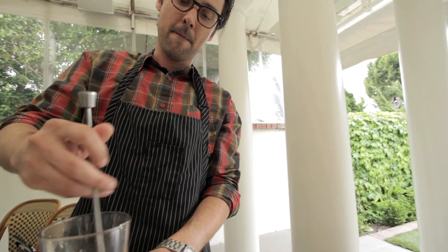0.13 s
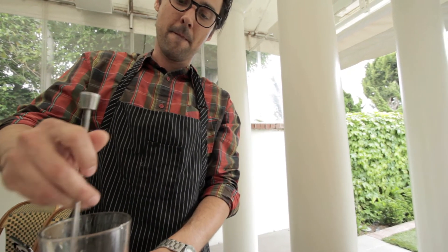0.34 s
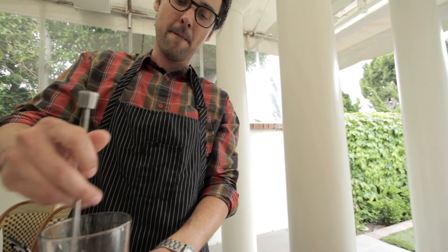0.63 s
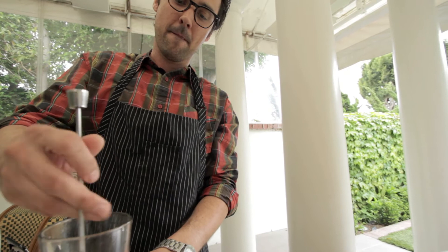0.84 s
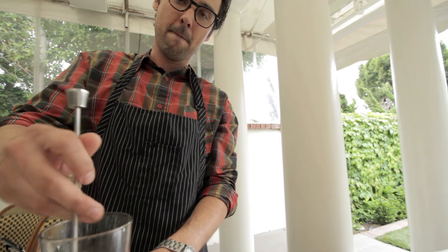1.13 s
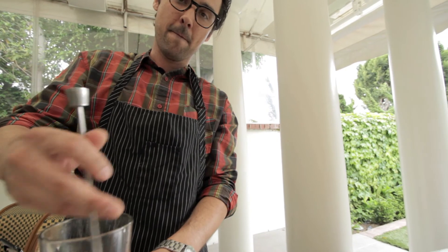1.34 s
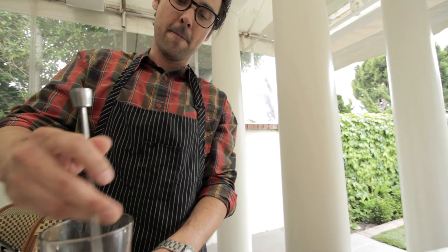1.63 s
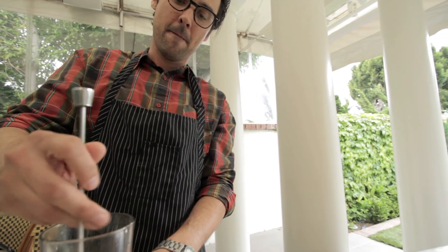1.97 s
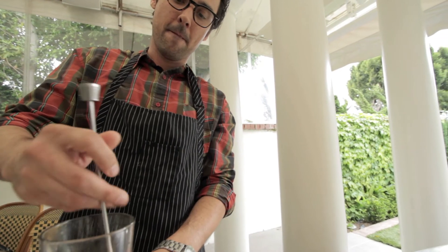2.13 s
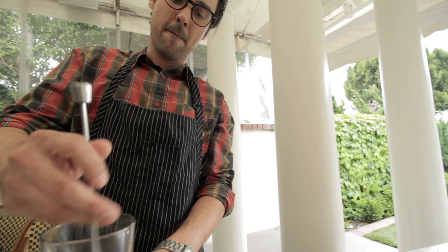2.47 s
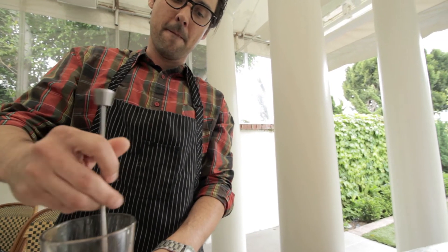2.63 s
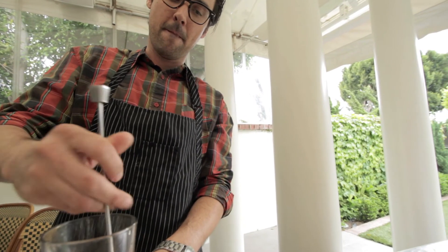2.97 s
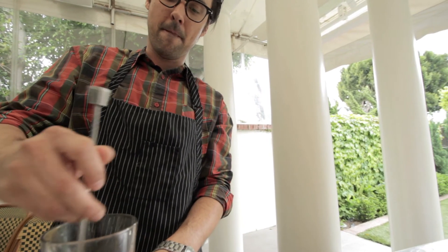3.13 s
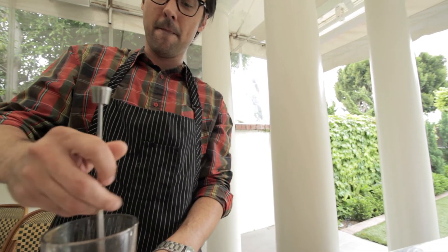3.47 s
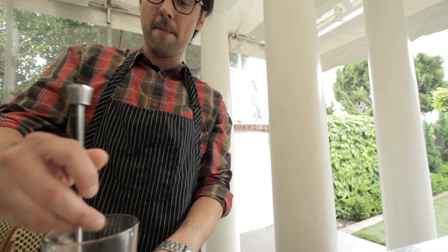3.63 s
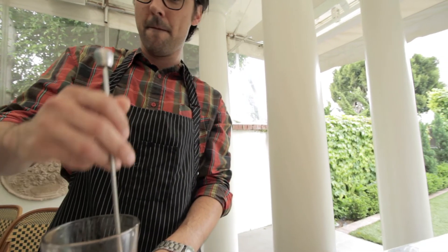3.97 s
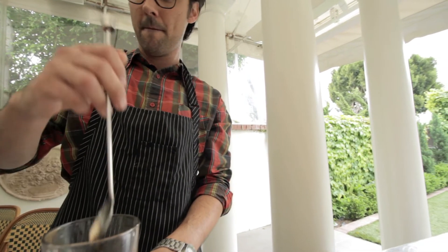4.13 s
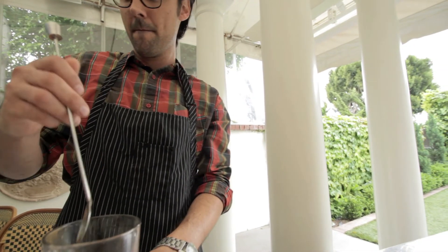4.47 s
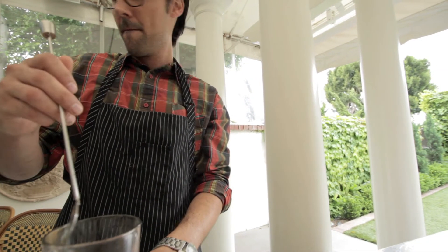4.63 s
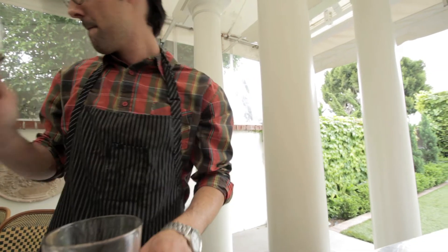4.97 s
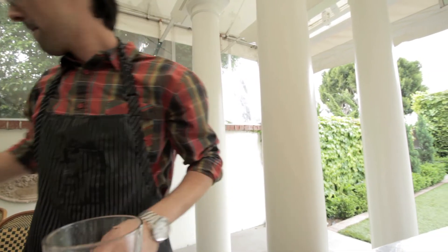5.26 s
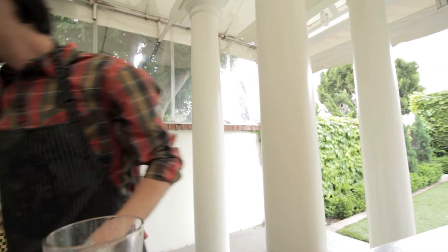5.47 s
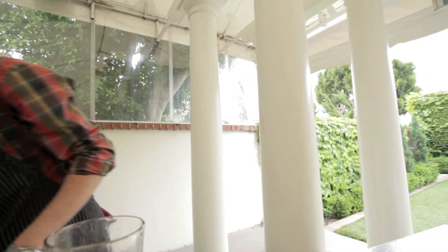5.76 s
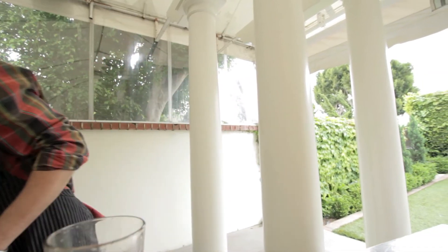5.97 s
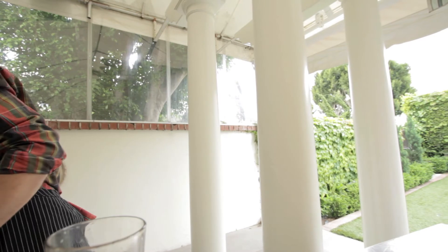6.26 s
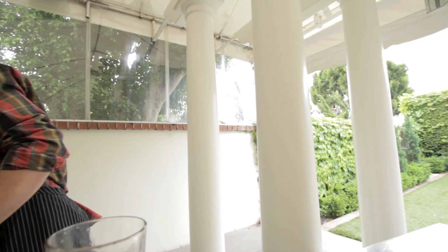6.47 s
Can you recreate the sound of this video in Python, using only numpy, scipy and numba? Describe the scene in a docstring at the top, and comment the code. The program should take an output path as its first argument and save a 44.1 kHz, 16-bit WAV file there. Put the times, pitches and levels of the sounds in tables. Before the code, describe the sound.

Rapid crisp ice ticks and short glassy rings fill the first four seconds, circling slightly between left and right, while the glass bumps dully on its table. The spoon drags out and taps the rim twice with ringing clinks. A quieter gap of low rumble follows, then things are set down and shuffled on hollow wood, more distant and more reverberant, knocking, scraping and briefly squeaking. Close stereo pickup on a covered porch.

```python
"""On a porch table, close to a small stereo microphone, a long spoon stirs ice in a tall glass.
Ice contacts are noise ticks that excite decaying modes of cubes and glass; the glass thuds on the table.
The spoon taps the rim twice, then things are set down and shuffled on a wooden shelf further off, heard as
knocks, modal ringing, grit noise and two squeaks. Shaped noise makes a low background rumble, with a part
near 100 Hz, whose heard level dips and recovers; scattered noise tails stand for the porch."""
import sys
import numpy as np
from scipy import signal
from scipy.fft import rfft, irfft, next_fast_len
from scipy.io import wavfile
from scipy.ndimage import uniform_filter1d, map_coordinates
from numba import njit

SR = 44100
rng = np.random.default_rng(int(sys.argv[2]) if len(sys.argv) > 2 else 0)


def inscribe(sig):
    """Save sig as 16-bit PCM at rate SR to the path in sys.argv[1].

    A 1-D sig is mono; a 2-D sig holds one channel per row.
    Samples are clipped to [-1, 1] before scaling.
    """
    pcm = np.round(np.clip(np.atleast_2d(sig).T, -1, 1) * 32767)
    wavfile.write(sys.argv[1], SR, pcm.astype(np.int16))


N = 291049

# All table levels are relative; each source adds its own offset.
# Cube and spoon contacts: (time [s], tick peak [dB], then against the tick: wall tone [dB],
# side tone [dB], treble [dB], cube ring [dB]; cube pitch [Hz])
ICE_CONTACTS = [(0.0054, -25, -3, -6, -10, -4, 2340), (0.0454, -8.5, -24, -9, -11, -8, 3090),
                (0.0628, -18, -6, -21, -14, 2, 3060), (0.1084, -24, -4, -28, -17, 0, 2600),
                (0.179, -7, -13, -29, -12, -13.5, 3054), (0.2124, -20, -26, -7, -9, -15, 3100),
                (0.2403, -7, -33, -22, -26, -17, 3170), (0.26, -10, -19, -27, -10, -24, 2260),
                (0.3144, -10, -7, -10, -15, -8, 2710), (0.3341, -2.5, -34, -18, -25, -14, 4000),
                (0.376, -27, -20, -22, -20, 4, 3100), (0.4489, -2, -20, -14, -13.5, -13, 3050),
                (0.543, -14, -17, -10, -10, -23, 2750), (0.5674, -20, -15, -20, -7, -23, 2240),
                (0.596, -8, -22.5, -14, -16, -16, 3750), (0.6274, -14.5, -9, -28, -29, -5, 3000),
                (0.7218, -24.5, -18, -23, -10, -13, 3070), (0.7786, -5.5, -49, -36, -11.5, -20, 3990),
                (0.7981, -14, -27, -27, -4, -16, 2920), (0.8483, -22, -8.5, -11, -28, -17, 2630),
                (0.8664, -4.5, -20, -28, -18, -21, 3830), (0.8777, -12, -40, -6, -11, -16, 4030),
                (0.9547, -16, -35, -26, -21, -12, 2600), (1.0056, -10.5, -21, -11, -18, -16, 3190),
                (1.0234, -8, -10, -28, -13, -21, 3060), (1.0755, -4, -18.5, -10.5, -15.5, -33, 2680),
                (1.1358, -9.5, -14, -15, -38, -21, 4060), (1.1532, -12, -17, -11.5, -32, -16, 2840),
                (1.1811, -5.5, -20, -16, -22, -5, 2790), (1.1926, -19.5, -4, -31, -25, 0.5, 3080),
                (1.276, -16, -32, -31, -8.5, -15, 3070), (1.2996, -10.5, -33, -36, -18, -16, 2900),
                (1.3478, -3, -15.5, -28, -12.5, -29, 2900), (1.434, -17.5, -37, -9, -17, -21, 3120),
                (1.4557, -15, -8, -10, -32, -6, 3060), (1.479, -7.5, -34, -16, -15, -19, 4240),
                (1.4855, -22.5, -17, -11, -26, 2.5, 3020), (1.5723, -22.5, -23, -7, -4, -13, 3040),
                (1.5846, -23.5, -15, -33, -21, 4.5, 2380), (1.6341, -8.5, -14.5, -11, -4.5, -31, 3000),
                (1.6887, -16.5, -3.5, -11, -16, -48, 3100), (1.7413, -11, -10, -17, -9.5, -21, 2870),
                (1.764, -7, -20, -11, -20, -6.5, 3150), (1.8048, -24, -8, -30, -15, 2.5, 2750),
                (1.8592, -7.5, -23, -17, -11, -4, 2730), (1.8954, -11.5, -12, -9, -13, -24, 2700),
                (1.9344, -11, -19, -37, -7, -30, 2860), (1.9794, -19.5, -5.5, -12, -13, -29, 2460),
                (2.0009, -10.5, -55, -13.5, -8, -34, 3900), (2.1266, -33, -14, -28, 3, -9, 2720),
                (2.1615, -15.5, -13.5, -25, -5, -7.5, 3030), (2.1774, -13, -10, -12, -9, -27, 2960),
                (2.2146, -19.5, -5, -28, -3, -20, 2290), (2.2608, -17, -5, -15, -12, -26, 2520),
                (2.2804, -16, -9, -6.5, -17, -28, 3070), (2.2971, -10.5, -26, -14, -13.5, -20, 3000),
                (2.3446, -21.5, -5, -23, -15, -6, 3080), (2.4124, -10.5, -9.5, -5.5, -24, -14, 4050),
                (2.4751, -7.5, -10, -19, -8, -29, 2520), (2.5192, -15, -6, -13, -10, -20, 2660),
                (2.5366, -9, -9, -11, -16, -21, 2720), (2.5646, -7.5, -15.5, -16.5, -26, -20, 3110),
                (2.6096, -27, -39, -25, -23, -6, 2980), (2.6285, -5, -26, -25, -23, -6.5, 2945),
                (2.717, -12, -10, -27, -6.5, -17, 2670), (2.7484, -9.5, -18, -23, -17, -32, 3970),
                (2.813, -12.5, -9.5, -27, -23, -19, 3200), (2.8432, -7, -20, -15, -18, -22, 2950),
                (2.8738, -20.5, -32, -27, -29, 0, 2960), (2.9712, -13, -3.5, -7, -13.5, -15, 3400),
                (3.0084, -15.5, -11, -13, -27, -19, 3120), (3.0761, -21, -6, -17, -10, -26, 3020),
                (3.1067, -16, -33, -6, -12, -12, 4030), (3.1174, -18.5, -23, -15, -23, -1, 3850),
                (3.1356, -16, 1, -16, -31, -7, 3760), (3.1802, -12.5, -55, -13, -12.5, -14, 2870),
                (3.242, -12.5, -12, -17, -30, -22, 3060), (3.2625, -4, -17.5, -29, -8.5, -31, 2200),
                (3.3352, -17.5, -14, -19, -20, -23, 2220), (3.3903, -8, -15, -23, -18, -29, 3000),
                (3.5084, -15.5, -7.5, -23, -18, -21, 2950), (3.558, -16, -22, -12, -18, -13, 3080),
                (3.5885, -0.5, -15.5, -10.5, -7.5, -31, 3940), (3.5957, -10, -24, -12, -18, -8, 4100),
                (3.654, -10.5, -29, -11, -6, -24, 3100), (3.6751, -7.5, -11, -13, -11.5, -20, 3000),
                (3.7359, -14.5, -24, -12, -22, -18, 3060), (3.768, -21.5, -2, -27, -36, 4.5, 2630),
                (3.8004, -18, -21, -13, -24, -22, 3220), (3.8701, -8.5, -14, -25, -11.5, -18, 2680),
                (3.8896, -18.5, -40, -7, -5, -2.5, 2510), (3.9109, -30, 1.5, -18, -26, 10, 2480),
                (3.9589, -24.5, 3, -6, -28, -1, 2500), (3.9894, -40.5, 18, -23, -35, 7, 3100),
                (4.0414, -30, -19, -20, -14, -8, 3140)]
# Spoon on the rim: (time [s], tick peak [dB], then against the tick: wall tone [dB], side tone [dB],
# treble [dB], short ring [dB]; short ring pitch [Hz])
RIM_TAPS = [(4.3784, 0.56, -11, -28.5, -24, -24.1, 2800), (4.555, 0.54, -13.5, -26.5, -25.5, -13, 2310)]
# Glass modes before loading: (frequency [Hz], level [dB], t60 [s], name of the level that drives it)
GLASS_MODES = [(1928, -11, 0.7, "wall"), (1939, 2, 0.27, "wall"), (4338, -12, .6, "second"),
               (4344, -2, 0.36, "second"), (4870, 2, 0.085, "treble"), (4835, -1.5, 0.4, "side"),
               (7400, -4, 0.45, "treble"), (7488, -2, 0.13, "treble"), (8667, -10, .1, "treble"),
               (11220, -4, 0.25, "side"), (14030, -14, .08, "treble")]
# Drive of the second glass tone against the tick: (time [s], level [dB])
SECOND_TONE_LEVEL = [(0, -36), (2.0, -87), (2.7, -31), (3.5, -11.5), (3.6, -15.5), (3.75, -4), (4.0, -29),
                     (4.35, -17)]
# Ice cube modes: (frequency [Hz], level [dB], t60 [s], name of the level that drives it)
CUBE_MODES = [(3046, -4.5, 0.027, "cube"), (4755, 9.5, 0.022, "side"), (5455, 7, 0.0089, "side"),
              (7300, 10, 0.013, "treble"), (10380, 11.5, 0.0098, "treble"), (10600, -63, 0.0074, "cube")]
# Glass rocking on the table: (time [s], peak [dB], grinding noise against it [dB])
TABLE_THUDS = [(0.009, -20.5, -16), (0.275, -17.5, -13.5), (0.551, -22.5, -15.5), (0.789, -22.5, -5.5),
               (1.088, -23, -11), (1.348, -18, -7), (1.634, -16, -10), (1.94, -22.5, -11.5),
               (2.207, -22, -12.5), (2.476, -17, -10.5), (2.817, -30, -13), (3.56, -27.5, -6.5)]
# Table top modes: (frequency [Hz], level [dB], t60 [s])
TABLE_MODES = [(165, -2, 0.18), (184.7, 2, 0.048), (258, -3.5, 0.076)]
# Things set down on a shelf: (time [s], peak [dB], hollow tone against it [dB], treble against it [dB])
SHELF_KNOCKS = [(5.774, 0, -18.5, -12), (5.787, -10, -5, -12), (6.024, -5, -14, -12),
                (6.038, -12, -17, -14), (6.083, -7, -11.5, -15), (6.128, -12.5, -28, -29),
                (6.205, -3.5, 0, -36), (6.217, -37, -6, -20), (6.234, -24, 4, -10)]
# Shelf modes: (frequency [Hz], level [dB], t60 [s])
SHELF_MODES = [(461.6, -4, 0.091), (586, -1, 0.11), (649, -4, 0.083), (1084, -29, 0.11),
               (1217, -2.5, 0.018), (1330, -2.5, 0.0088), (2344, -11, 0.026)]
# Drags across the shelf: (time [s], length [s], level [dB], treble against it [dB])
SHELF_SCRAPES = [(5.51, 0.08, -40.5, 2), (5.798, 0.19, -36, -5), (5.88, 0.072, -35.5, 1.5),
                 (6.054, 0.045, -50, -7), (6.079, 0.072, -29.5, -7.5), (6.222, 0.13, -29, -19.5),
                 (6.564, 0.047, -46, 15)]
# Narrow squeaks: (time [s], frequency [Hz], level [dB], length [s])
SHELF_SQUEAKS = [(5.909, 1593, -26, 0.045), (5.977, 1590, -33.5, 0.043)]
# Heard level of the background rumble, which dips and recovers: (time [s], level [dB])
RUMBLE_LEVEL = [(0.0, -23), (0.2, -27), (0.86, -28.5), (1.3, -27), (2.15, -29.5), (2.43, -24.5), (2.8, -30),
                (3.0, -26), (3.88, -29), (4.34, -19.5), (4.45, -34.5), (4.85, -24.5), (5.5, -16.5),
                (6.05, -19.5), (6.19, -22.5), (6.41, -29), (6.6, -23)]
# Rumble spectrum: (frequency [Hz], level per Hz [dB])
RUMBLE_SPECTRUM = [(20, -28), (32, -6.5), (41, 2), (55, -5), (80, -17), (108, 0.5), (140, -7), (230, -10),
                   (350, -20), (1400, -36.5), (3400, -46), (4300, -51), (8600, -52.5), (15500, -61.5)]
# Correlation of the rumble, left with right: (frequency [Hz], correlation [0-1])
RUMBLE_LIKENESS = [(30, 0), (70, 0.64), (150, 0.44), (500, 0.67), (2000, 0.91), (8000, 0)]
# Heard level of the rumble's part near 100 Hz, which rises and dips: (time [s], level [dB])
LOW_RUMBLE_LEVEL = [(3.6, -43), (4.3, -25.5), (4.5, -64), (5.1, -19), (5.6, -18), (6.1, -28.5),
                    (6.3, -31.5), (6.6, -21.5)]
# Phase of the near sounds between the ports: (frequency [Hz], lead of the right port [rad])
PORT_PHASE = [(100, -3.5), (3300, 0.5), (4500, 1.5), (7400, 1.2), (9600, 2), (13000, 1.5), (16000, -1.5)]

# load of spoon and moving ice on the wall: shares of ringing time and of the deepest tone's pitch
WET_DAMP, WET_PITCH, DRY_PITCH = 0.55, 0.992, 1.0
# jostling follows the contacts by a power law, over a resting level
SLOSH_DB, SLOSH_LAW, SLOSH_REST_DB = -36, 0.4, -45
SLOSH_HALF_SMOOTH_S, SETTLE_T60_S, SPOON_OUT_S = 0.004, 0.079, 4.29
LIFT_S, LIFT_LENGTH_S, LIFT_DB = 4.065, 0.079, -28  # the spoon drags up the wall
TURN_HZ, CIRCLE_US = 3.55, 8.7  # circling rate; peak time shift of each port, in opposite directions
SCRAPE_ATTACK_S, SCRAPE_RELEASE_S = 0.044, 0.028
JOLT_DB, JOLT_T60_S = -14.5, 0.11  # each knock shakes loose a spray of grit
PORCH_T60_S, PORCH_DB = 0.89, -17
LEFT_DB = 1.5  # left against right
TOP_HZ = 15730
T = np.arange(N) / SR
SIZE = next_fast_len(N, True)
HZ = np.maximum(np.arange(SIZE // 2 + 1) * SR / SIZE, 1.)
NOISE = rng.standard_normal(2 * N)
# random values at 120 a second, joined by straight lines
WAVER = np.interp(np.arange(2 * N) * 120 / SR, np.arange(2000), rng.standard_normal(2000))


def strike(rows, damp, pitch, push, rattle, wobble, glass_db, cube_db, tick_db, thump_db):
    """Modal excitation: contacts ring glass and cubes, whose pitch wavers by a small share."""
    s, peak_db, wall, side, treble, cube, cube_hz = np.transpose(rows)
    second = np.interp(s, *np.transpose(SECOND_TONE_LEVEL))
    drive = {"wall": wall, "second": second, "side": side, "treble": treble, "cube": cube}

    # a contact is a small cluster: the cube grazes, hits and bounces
    scatter = rng.random((len(s), 4)) + [-1.5, -0.38, 0.33, 0.37]
    late = np.hstack([0 * s[:, None], rattle * scatter])
    count = late.shape[1]
    parts = np.maximum(s[:, None] + late, 0).ravel()
    part_db = (peak_db[:, None] + [-2, -12, -5, -8.5, -24]).ravel()

    tick = burst(blows(parts, undb(part_db)), 0.0068)
    hiss = burst(blows(parts, undb(part_db + np.repeat(treble, count))), 0.012)
    thump = burst(blows(s, undb(peak_db)), 0.043)
    out = undb(tick_db) * band(tick, 2140, 11300)
    out += undb(tick_db + 11.5) * band(hiss, 9200, 9900)
    out += undb(thump_db) * band(thump, 380, 2200)

    # damp changes the ringing time most in the high modes
    modes = [(loaded(f, pitch), db + glass_db, t * damp ** (f / 3500), c) for f, db, t, c in GLASS_MODES]
    modes += [(f, db + cube_db, t, c) for f, db, t, c in CUBE_MODES]
    for f, db, t60, driver in modes:
        chance_db = 2.5 * rng.standard_normal(len(s))
        size = undb(peak_db + drive[driver] + db + chance_db)
        out += ring(blows(s, size), f, t60, push, wobble * f)

    # each contact has its own short ring and pitch, a little different at each bounce
    t = np.arange(int(.04 * SR)) / SR
    shape = np.exp(-t / 0.0039) * (1 - np.exp(-t / 0.0014))
    ring_db = part_db + np.repeat(cube, count) + cube_db + 5.5
    ring_hz = np.repeat(cube_hz, count) * (1 + 0.034 * rng.standard_normal(late.size))
    for start, db, hz in zip(parts, ring_db, ring_hz):
        at = int(start * SR)
        out[at:at + len(t)] += undb(db) * np.sin(2 * np.pi * hz * t) * shape
    return out


def slosh():
    """Superposed impacts: many faint ice ticks at random times, louder just after the clear contacts."""
    chance = rng.random((1500, 3)).T
    size = undb(-2.5 * np.log(chance[1] + 1e-9)) * np.sign(chance[2] - .5)
    ticks = blows(4.25 * chance[0], size)
    cubes = sum(undb(db) * ring(ticks, f, t) for f, db, t, _ in CUBE_MODES[:3])
    wall = sum(undb(db) * ring(ticks, loaded(f, WET_PITCH), t * WET_DAMP) for f, db, t, _ in GLASS_MODES[:4])
    noise = band(burst(ticks, 0.016), 660, 10370)
    body = unit(cubes) + undb(0.5) * unit(wall) + undb(-1.5) * unit(noise)

    s, peak_db = np.transpose(ICE_CONTACTS)[:2]
    stir = dying(s, undb(peak_db), SETTLE_T60_S) + undb(SLOSH_REST_DB)
    stir = uniform_filter1d(stir, int(2 * SLOSH_HALF_SMOOTH_S * SR))
    fade = np.clip((SPOON_OUT_S - T) / 0.23, 0, 1)
    return body * undb(SLOSH_DB) * (10 * stir) ** SLOSH_LAW * fade


def lift():
    """Friction excitation: the spoon's back rubs up the wall and makes the glass sing unsteadily."""
    chance = rng.random((60, 2)).T
    rub = blows(LIFT_S + LIFT_LENGTH_S * chance[0], chance[1] - .5)
    out = np.zeros(N)
    for f, db, t60, _ in GLASS_MODES[1:8]:
        out += undb(db) * ring(rub, 1.01 * f, 0.14 * t60, 0.001, 0.0186 * f)
    return undb(LIFT_DB) * out


def loaded(hz, pitch):
    """Mass loading: the load lowers the deepest tone most."""
    return hz * pitch ** (GLASS_MODES[0][0] / hz) ** 2


def circling(x):
    """Time-of-arrival difference: each port hears the contacts earlier or later as the ice circles."""
    lag = CIRCLE_US * 1e-6 * SR * np.sin(2 * np.pi * TURN_HZ * T) * (T < SPOON_OUT_S)
    return np.array([map_coordinates(v, [np.arange(N) + way * lag], mode="mirror")
                     for v, way in zip(x, (1, -1))])


def rocking():
    """Plate resonance: the base of the glass bumps and grinds on the table top."""
    s, peak_db, upper_db = np.transpose(TABLE_THUDS)
    board = sum(ring(chatter(s, undb(peak_db + db + 5), 0.33), f, t) for f, db, t in TABLE_MODES)
    grind = burst(blows(s, undb(peak_db + upper_db)), 0.41)
    return board + undb(17.5) * band(grind, 206, 830)


def shelf():
    """Impact and friction: hard knocks ring a hollow wooden shelf, with scraping between them."""
    s, peak_db, hollow_db, treble_db = np.transpose(SHELF_KNOCKS)
    knock = burst(blows(s, undb(peak_db)), 0.014)
    crack = burst(blows(s, undb(peak_db + treble_db)), 0.0073)
    out = undb(2.5) * band(knock, 620, 3300) + undb(3.0) * band(crack, 5400, 10200)
    for f, db, t60 in SHELF_MODES:
        chance_db = 0.48 * rng.standard_normal(len(s))
        # the hollow level drives only the modes below 800 Hz
        size = undb(peak_db + hollow_db * (f < 800) + db - 1.5 + chance_db)
        out += ring(blows(s, size), f, t60, wobble_hz=39.0)

    chance = rng.random((1500, 2)).T
    grains = blows(5.4 + 1.4 * chance[0], undb(-2.5 * np.log(chance[1] + 1e-9)))
    grit = burst(grains, 0.034) * (T > 5.4)
    low, high = band(grit, 640, 2040), band(grit, 3900, 8300)
    dull = dying(s, undb(peak_db + JOLT_DB), JOLT_T60_S)
    bright = dying(s, undb(peak_db + JOLT_DB + treble_db), JOLT_T60_S)
    for start, length, db, top_db in SHELF_SCRAPES:
        attack = np.clip((T - start) / SCRAPE_ATTACK_S, 0, 1)
        shape = attack * np.exp(-np.maximum(T - start - length, 0) / SCRAPE_RELEASE_S)
        dull = dull + undb(db) * shape
        bright = bright + undb(db + top_db) * shape
    # unit() averages over the whole scene; this refers the grit's energy to 1.2 s
    return out + np.sqrt(1.2 * SR / N) * (unit(low) * dull + unit(high) * bright)


def squeaks():
    """Amplitude-modulated pure tones: short narrow squeaks among the scraping."""
    out = np.zeros(N)
    for s, hz, db, length in SHELF_SQUEAKS:
        shape = np.clip(1 - (2 * (T - s) / length - 1) ** 4, 0, 1)
        out += undb(db) * np.sin(2 * np.pi * hz * T) * shape
    return out * flutter(2.0)


def porch(x, t60, db, alike, dull):
    """Diffuse reverberation: a short tail from wall, floor and roof, cross-mixed, with little bass."""
    t = np.arange(int(.6 * SR)) / SR  # the tail is cut off at 0.6 s
    tail = rng.standard_normal((2, len(t))) * np.exp(-np.log(1000) * t / t60) * (t > .003)
    tail = signal.lfilter([1, -1], [1, -.96], tail + alike * tail[::-1])
    tail = signal.lfilter([1], [1, -dull], tail)
    tail = tail / np.sqrt(np.sum(tail[0] ** 2))
    size = next_fast_len(N + len(t), True)
    return undb(db) * irfft(rfft(x, size) * rfft(tail, size), size)[:, :N]


def rumble():
    """Partly coherent noise: a low background rumble whose heard level dips and recovers."""
    mid, side = (rfft(rng.standard_normal(SIZE)) * undb(across(RUMBLE_SPECTRUM)) for _ in range(2))
    like = np.clip(across(RUMBLE_LIKENESS), 0, 1)
    opposite = np.array([[1], [-1]])
    both = irfft(np.sqrt(1 + like) * mid + np.sqrt(1 - like) * side * opposite, SIZE)[:, :N]
    return unit(both) * undb(along(RUMBLE_LEVEL))


def low_rumble():
    """Band-limited noise: the rumble's part near 100 Hz, nearly the same in both ports."""
    low = [unit(band(band(rng.standard_normal(N), 74, 126.4), 74, 126.4)) for _ in range(2)]
    both = low[0] + 0.1 * low[1] * np.array([[1], [-1]])
    return both * undb(along(LOW_RUMBLE_LEVEL)) * (T > LOW_RUMBLE_LEVEL[0][0])


def ring(x, hz, t60, push=0.00015, wobble_hz=1.7):
    """Damped resonance: each unit impulse starts a decaying sine; push is the contact time in s."""
    out, on = np.zeros(N), sounding(x, t60)
    wobble = 2 * np.pi * wobble_hz / SR * walk()[on]
    fall = np.exp(-np.log(1000) / (t60 * SR))
    swell = np.exp(-1 / (push * SR))
    out[on] = mode(x[on] + 1e-18, np.exp(2j * np.pi * hz / SR), fall, swell, wobble)
    return out


@njit
def mode(x, turn, fall, swell, wobble):
    """Rotating-phasor resonator with wavering pitch, smoothed once more so that the tone swells in."""
    y, z, soft = np.empty(len(x)), 0j, 0j
    for i in range(len(x)):
        step = turn * (1 + 1j * wobble[i] - .5 * wobble[i] ** 2)
        z = z * step * fall + x[i]
        soft = soft * step * swell + (1 - swell) * z
        y[i] = soft.imag
    return y


def blows(s, size):
    """Impulsive force: one impulse for each blow."""
    x = np.zeros(N)
    np.add.at(x, np.minimum((s * SR).astype(int), N - 1), size)
    return x


def burst(x, t60):
    """Exponential decay: noise that jumps at each impulse and dies away."""
    fall = np.exp(-np.log(1000) / (t60 * SR))
    at = rng.integers(N)
    return signal.lfilter([1], [1, -fall], np.abs(x) + 1e-18) * NOISE[at:at + N]


def chatter(s, size, t60):
    """Energy normalisation: a blow is a short rough push, of unit energy on average for unit size."""
    return burst(blows(s, size), t60) * np.sqrt(2 * np.log(1000) / (t60 * SR))


def dying(s, size, t60):
    """Exponential decay: an envelope that jumps at each blow and dies away."""
    return signal.lfilter([1], [1, -np.exp(-np.log(1000) / (t60 * SR))], blows(s, size))


def walk():
    """Random modulation: a quick wavering, spread near 1."""
    at = rng.integers(N)
    return WAVER[at:at + N]


def flutter(db):
    """Amplitude modulation: a gain that wavers at random."""
    return undb(db * walk())


def sounding(x, tail):
    """Finite support: the stretch from the first push to tail s after the last."""
    on = np.flatnonzero(np.abs(x) > 1e-7)
    return slice(on[0], min(on[-1] + int(tail * SR), N))


def band(x, lo_hz, hi_hz):
    """Band-pass filtering over the sounding stretch."""
    out, on = np.zeros(N), sounding(x, .05)
    out[on] = signal.sosfilt(signal.butter(2, [lo_hz, hi_hz], "band", fs=SR, output="sos"), x[on])
    return out


def undb(db):
    """Decibel law: level in dB to amplitude gain."""
    return 10 ** (np.asarray(db) / 20)


def along(table):
    """Linear interpolation: a level curve at every sample."""
    return np.interp(T, *np.transpose(table))


def across(table):
    """Log-frequency interpolation: a spectrum at every frequency bin."""
    hz, value = np.transpose(table)
    return np.interp(np.log(HZ), np.log(hz), value)


def unit(x):
    """Root-mean-square normalisation to 1."""
    return x / np.sqrt(np.mean(x ** 2))


def scene():
    """Superposition of near glass, farther shelf, porch and rumble."""
    glass = strike(ICE_CONTACTS, WET_DAMP, WET_PITCH, push=0.0023, rattle=0.0091, wobble=0.0072,
                   glass_db=-1.5, cube_db=0.5, tick_db=-1.5, thump_db=-32)
    glass += strike(RIM_TAPS, 1.145, DRY_PITCH, push=0.00033, rattle=0.00041, wobble=0.0018,
                    glass_db=3.0, cube_db=-6, tick_db=3.5, thump_db=-7)
    glass += slosh() + lift()
    # most of the treble of the glass reaches the right port first
    phase = .5j * across(PORT_PHASE) * np.array([[-1], [1]])
    near = irfft(rfft(glass, SIZE) * np.exp(phase), SIZE)[:, :N]
    out = circling(near) + porch(glass, PORCH_T60_S, PORCH_DB, alike=0.38, dull=0.82) + rocking()

    far = shelf() + squeaks()
    out += far * undb(np.array([[1.2], [-1.2]])) + porch(far, 0.78, -4, alike=0.25, dull=0.46)
    out += rumble() + low_rumble()
    return out * undb(np.array([[LEFT_DB], [-LEFT_DB]]) / 2)


def record(dry):
    """Amplitude limiting and low-pass filtering: the loudest peaks clip and the top is cut."""
    cut = signal.ellip(10, .2, 80, TOP_HZ, fs=SR, output="sos")
    return np.clip(signal.sosfilt(cut, np.clip(dry, -1, 1)), -1, 1)


dry = scene()
out = record(dry)
inscribe(out)
```